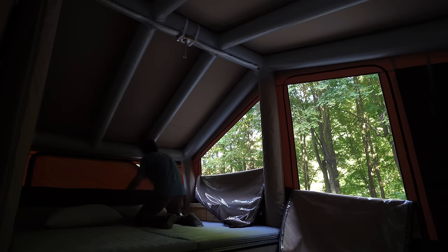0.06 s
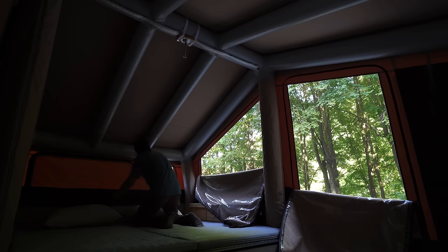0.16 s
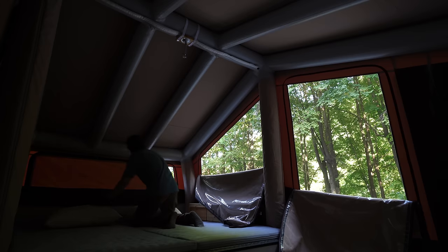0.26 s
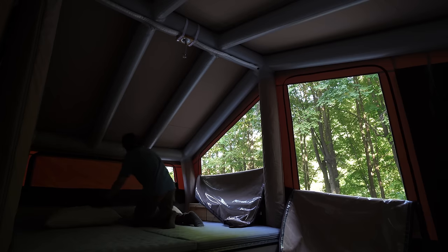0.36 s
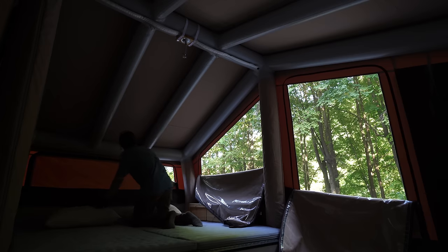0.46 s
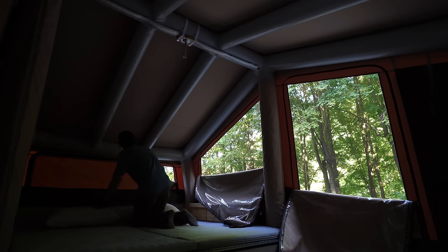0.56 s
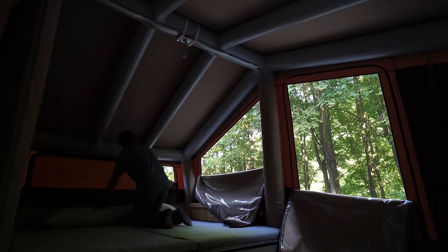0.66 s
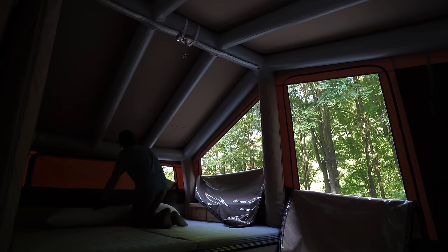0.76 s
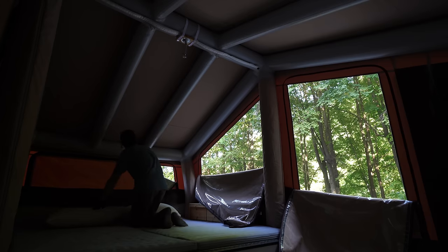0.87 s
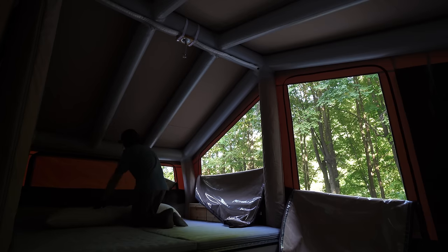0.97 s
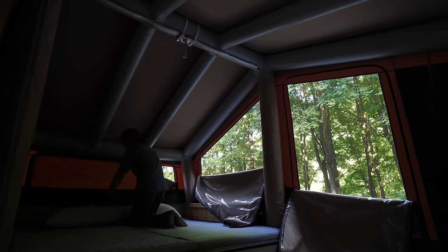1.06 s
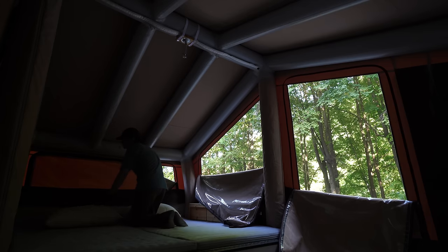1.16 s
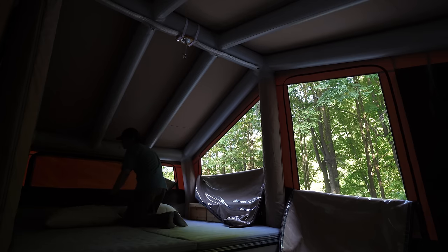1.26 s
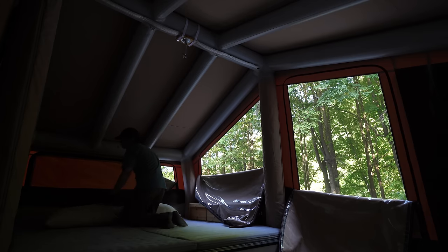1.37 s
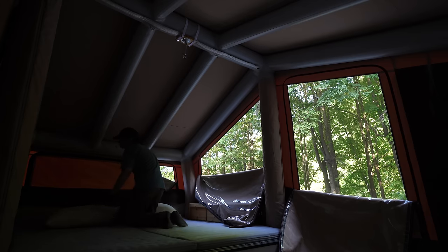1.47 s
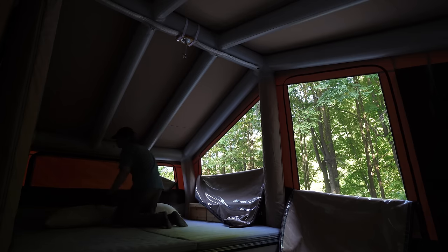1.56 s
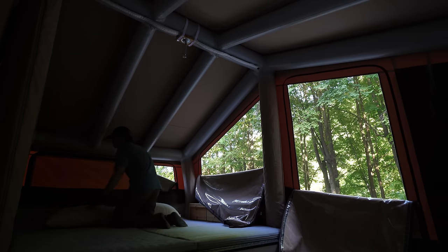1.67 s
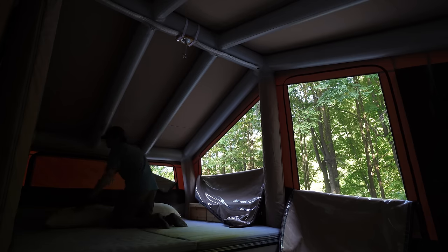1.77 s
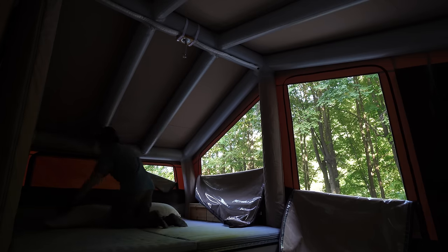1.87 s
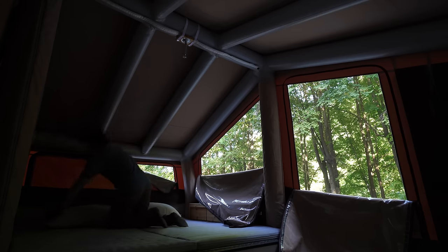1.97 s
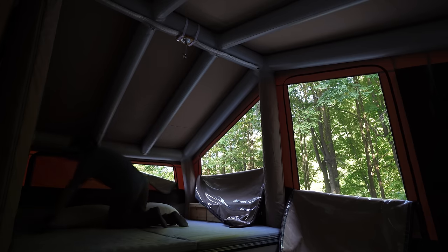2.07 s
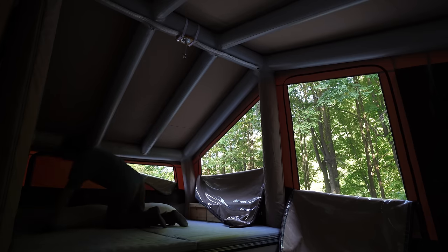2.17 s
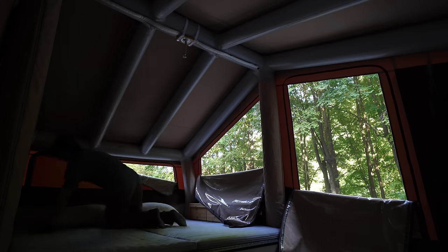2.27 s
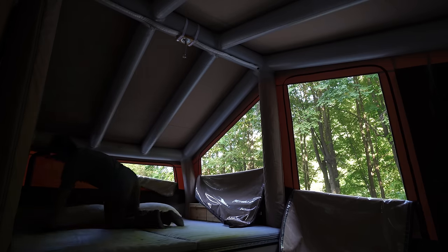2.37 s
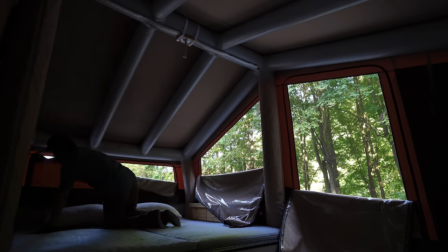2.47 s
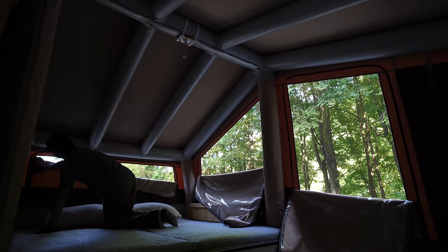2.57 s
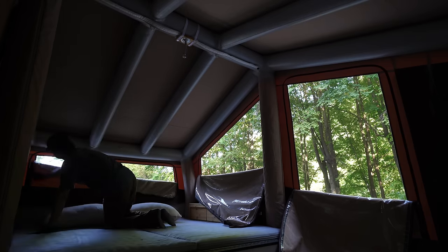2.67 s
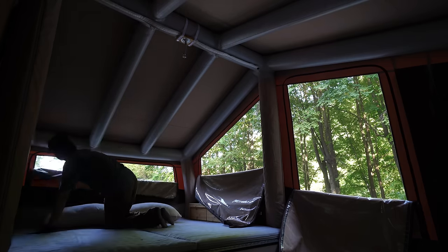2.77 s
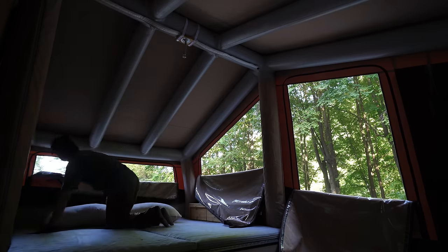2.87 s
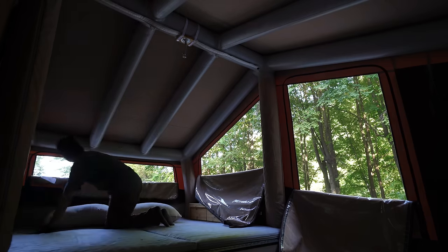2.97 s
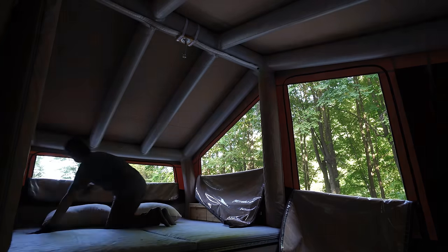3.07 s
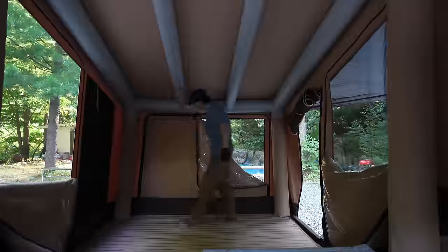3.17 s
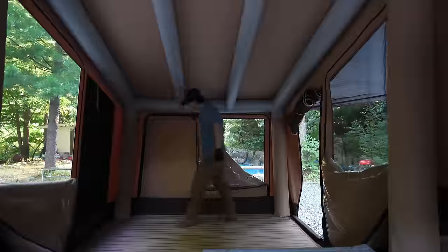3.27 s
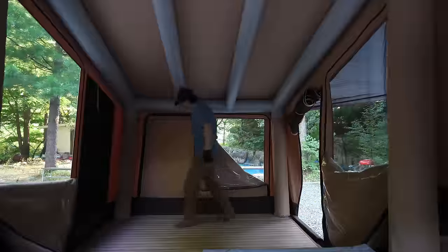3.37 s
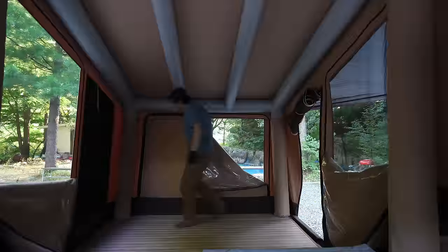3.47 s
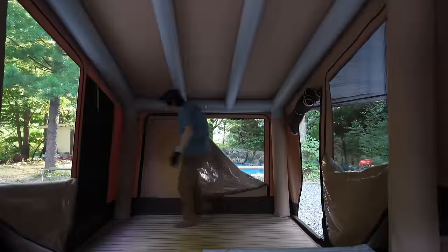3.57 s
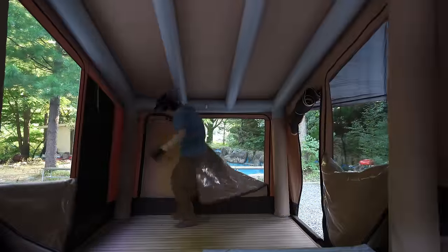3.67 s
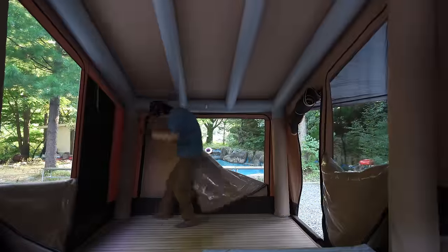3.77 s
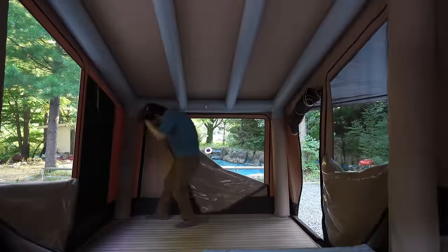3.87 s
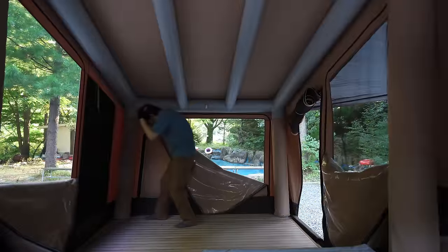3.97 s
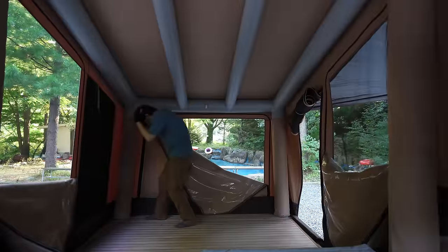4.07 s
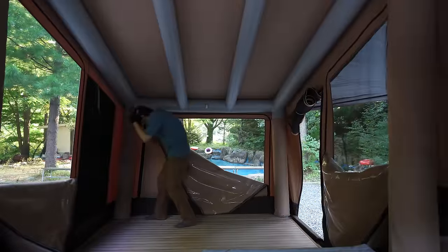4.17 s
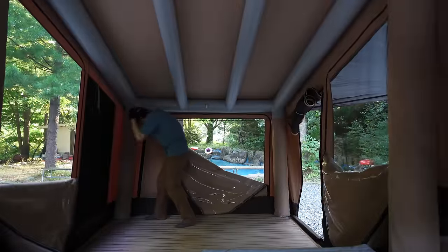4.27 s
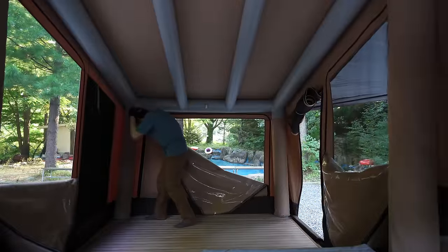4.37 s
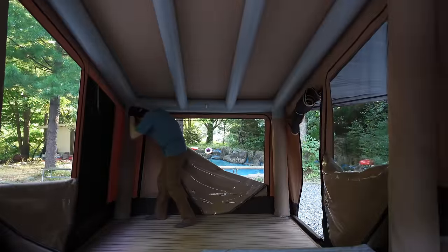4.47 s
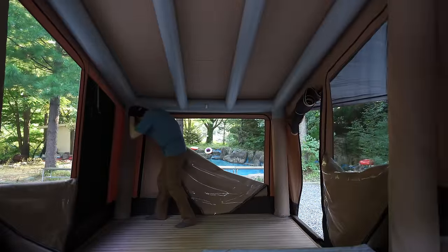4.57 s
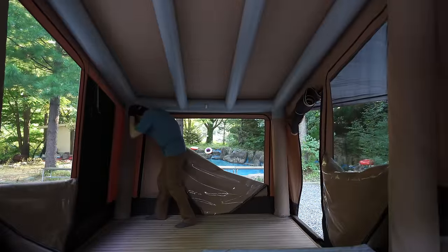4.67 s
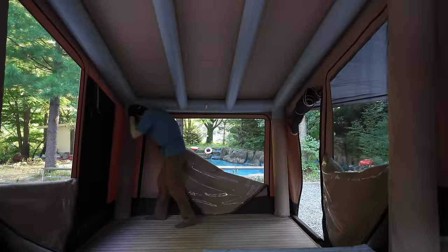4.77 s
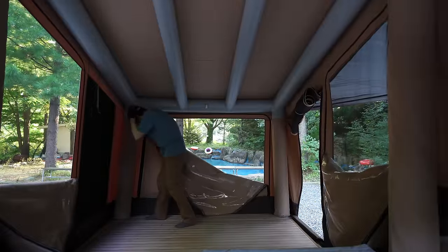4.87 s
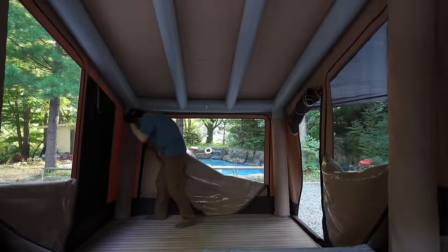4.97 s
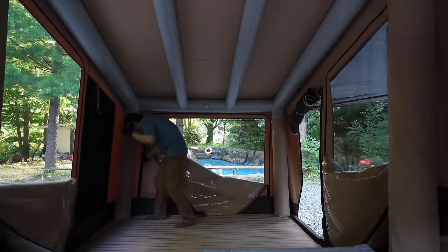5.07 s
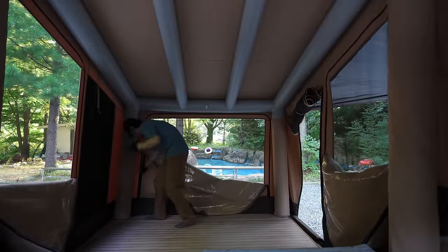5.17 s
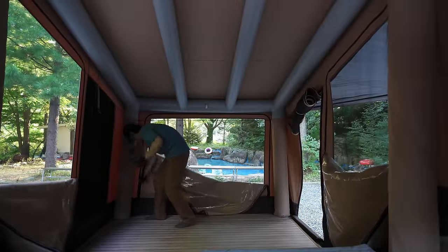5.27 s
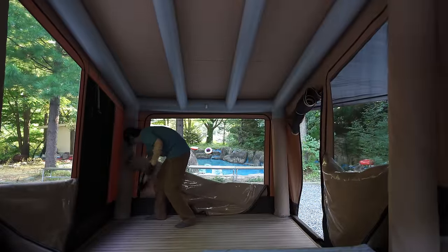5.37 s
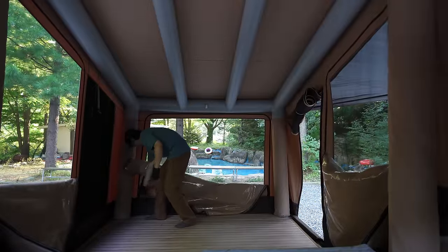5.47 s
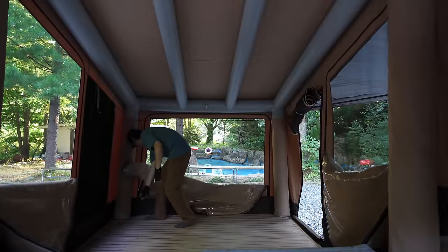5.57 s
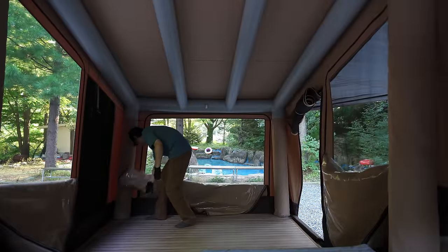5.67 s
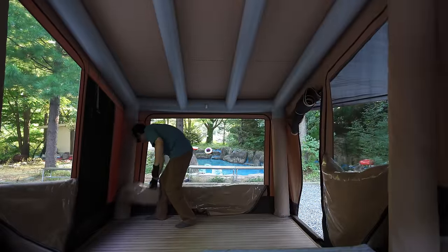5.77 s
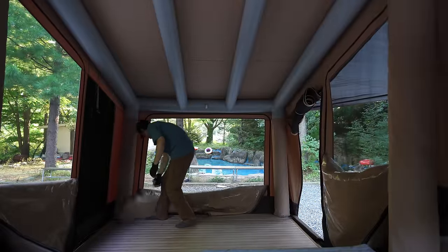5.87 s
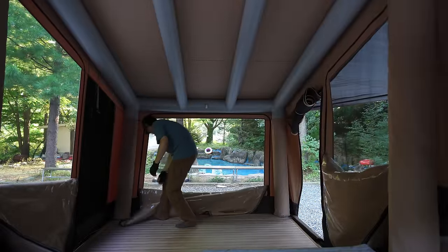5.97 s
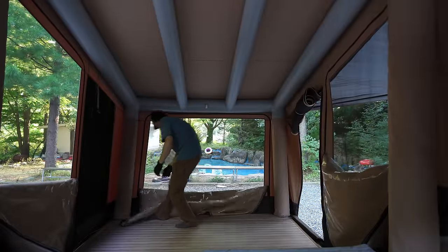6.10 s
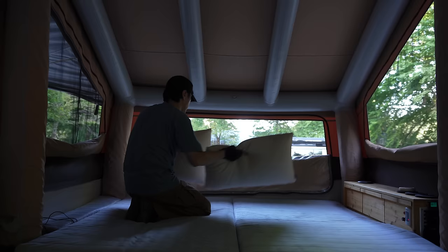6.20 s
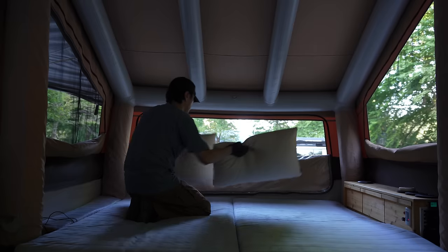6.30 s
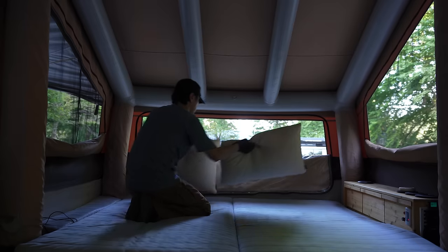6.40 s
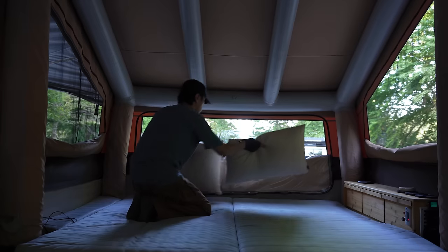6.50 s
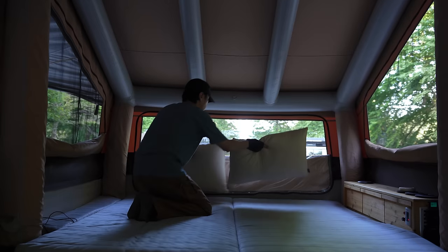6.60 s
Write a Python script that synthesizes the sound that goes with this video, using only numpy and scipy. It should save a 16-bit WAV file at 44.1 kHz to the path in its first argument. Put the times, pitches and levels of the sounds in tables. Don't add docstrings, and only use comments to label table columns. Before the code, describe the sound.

A zipper on a tent window buzzes in three long pulls, its pitch gliding up and down over crinkling coated fabric. Before the first come cloth flaps, knee thumps and tiny metal tab jingles under a fading cicada. Heavy footfalls and rumble accompany the second; slow tooth ticks lead into the third, which ends in hard snaps and a flap crack. Then near quiet, with light wind. Mono microphone inside, dry fabric acoustics.

```python
import sys
import numpy as np
from scipy import signal
from scipy.fft import rfft, irfft, next_fast_len
from scipy.io import wavfile
from scipy.ndimage import uniform_filter1d, map_coordinates

SR = 44100
rng = np.random.default_rng(int(sys.argv[2]) if len(sys.argv) > 2 else 0)


def put_to_file(sound):
    columns = np.atleast_2d(sound).T
    safe = np.clip(columns, -1, 1)
    whole_steps = np.round(safe * 32767)
    wavfile.write(sys.argv[1], SR, whole_steps.astype(np.int16))


def rack_gain(trim_db):
    fader = np.asarray(trim_db, float)
    return 10 ** (fader / 20)


N = 292824
T = np.arange(N) / SR

TAKE_BOUNDS = [0, 3.136, 6.237, 7]
TAKE = np.searchsorted(TAKE_BOUNDS, T, side="right") - 1


def unit(x):
    return x / np.sqrt(np.mean(x ** 2) + 1e-20)


def along(points, hz):
    f, v = np.transpose(points)
    return np.interp(np.log(hz + 1), np.log(f + 1), v)


def curves(rows):
    s, *cols = np.transpose(rows)
    return [np.interp(T, s, c) for c in cols]


def gate(start, end, edge):
    return np.clip(np.minimum(T - start, end - T) / edge + .5, 0, 1)


def wobble(rate, t=T):
    knots = rng.standard_normal(int((t[-1] - t[0]) * 1500))
    return map_coordinates(knots, [(t - t[0]) * rate])


def swells(rows):
    s, db, rise, fall = np.transpose(rows)[..., None]
    t, take = T[::32], TAKE[::32]
    shape_db = -20 * np.where(t < s, (s - t) / np.abs(rise), (t - s) / np.abs(fall))
    power = rack_gain(db + shape_db) ** 2 * (take == TAKE[(s * SR).astype(int)])
    return np.interp(T, t, np.sqrt(power.sum(axis=0)))


def sway(rows, t):
    s, db, half = np.transpose(rows)[..., None]
    return (db * np.exp(-((t - s) / half) ** 2)).sum(axis=0)


def filtered(x, response):
    m = next_fast_len(N + SR // 2)
    return irfft(rfft(x, m) * response(np.fft.rfftfreq(m, 1 / SR)), m)[:N]


def resonances(modes):
    return lambda f: sum(rack_gain(db) * 1j * f * w / (c * c - f * f + 1j * f * w) for c, w, db in modes)


def band_noise(hz, width):
    response = resonances([(hz, width, 0)])
    return unit(filtered(rng.standard_normal(N), lambda f: response(f) ** 2))


def noise_burst(t, order, band):
    return signal.lfilter(*signal.butter(N=order, Wn=band, btype="band"), rng.standard_normal(len(t)))


def rustle(spectrum, grain_db, grain_rate, gating=1):
    grains = rack_gain(grain_db * wobble(grain_rate)) * gating * rng.standard_normal(N)
    x = filtered(grains, lambda hz: rack_gain(along(spectrum, hz)))
    return x / np.sqrt(np.abs(uniform_filter1d(x ** 2, size=4000)) + 1e-20)


def breeze_and_floor():
    # (time [s], level [dB])
    breeze = [(0.0, -38.5), (0.3, -36), (1.05, -42), (1.44, -44.5), (2.27, -36.5), (2.55, -42), (2.7, -35),
              (3.2, -43.5), (3.4, -32), (3.86, -38), (3.98, -26.5), (4.12, -35), (4.64, -46.5), (5.09, -39),
              (5.2, -51), (6.2, -49), (6.25, -38), (6.64, -39)]
    # (frequency [Hz], density [dB per Hz])
    buffet = [(5, -9), (14, 0.5), (30, -14), (50, -21), (90, -63)]
    # (frequency [Hz], density [dB per Hz])
    rumble = [(35, -43), (60, 2.5), (80, 0), (160, -1), (300, -8.5), (500, -34.5)]
    floor_db = [-49.5, -53.5, -52]
    # (peak time [s], level [dB], rise [s], fall over 20 dB [s])
    steps = [(.37, -38.5, 0.2, 0.75), (1.08, -42, 0.071, -0.1), (1.79, -39.5, 0.06, 0.4),
             (2.25, -33.5, 0.28, 0.15), (2.7, -40, 0.13, 0), (3.33, -40.5, 0.43, 7),
             (3.705, -22.5, 0.024, 0.08), (3.92, -21.5, 0.043, 0), (4.6, -36.5, 0.055, -1),
             (5.18, -42, 0.16, 2), (5.92, -34.5, 0.066, 0.4), (6.14, -42, 0.32, -9)]
    buffet_db, = curves(breeze)
    floor = np.hypot(rack_gain(np.array(floor_db)[TAKE]), swells(steps))
    return rack_gain(buffet_db) * rustle(buffet, 1.4, 8) + rack_gain(-2.0) * floor * rustle(rumble, 2.3, 30)


def frame_shudder():
    start_s, hz, db, t60 = 3.95, 28.05, -22, 1.3
    since = np.clip(T - start_s, 0, None)
    return rack_gain(db - 60 * since / t60) * np.sin(2 * np.pi * hz * since)


def insects_and_birds():
    # (peak time [s], level [dB], rise [s], fall over 20 dB [s])
    cicada_swells = [
        (.1, -38.5, .5, 0.18),
        (.358, -42, 0.063, 0.16),
        (2.726, -54, .05, 0.73),
        (3.13, -55, .06, .1),
    ]
    # (start [s], end [s], level [dB])
    crickets = [
        (.42, .68, -55.5),
        (1.38, 1.68, -57),
        (3.25, 3.45, -59),
        (4.297, 4.6, -57),
    ]
    # (time [s], frequency [Hz], level [dB], length [s])
    birds = [
        (4.15, 5070, -57, .1),
        (6.54, 5270, -54, .06),
    ]
    steady = rack_gain(-52) * (T < TAKE_BOUNDS[1])
    pulses = 1 + 0.17 * np.sin(2 * np.pi * 115 * T)
    cicada = rack_gain(-5.5) * (steady + swells(cicada_swells)) * pulses * band_noise(8210, 1500)
    trill = sum(rack_gain(db) * gate(a, b, edge=.05) for a, b, db in crickets)
    trill = trill * (1 + .5 * np.sin(2 * np.pi * 105 * T)) * band_noise(6800, 260)
    chirps = sum(rack_gain(db) * gate(s - d / 2, s + d / 2, edge=.03) * band_noise(hz, 300)
                 for s, hz, db, d in birds)
    return cicada + trill + chirps


def cloth(cycle, drumming, drag):
    # (frequency [Hz], density [dB per Hz])
    drum_spectrum = [(200, -33), (380, -9.5), (480, 1.5), (900, 0.5), (1600, -2), (2500, -8.5), (4000, -23),
                     (7000, -60)]
    # (frequency [Hz], density [dB per Hz])
    rub_spectrum = [(700, -11), (1800, 0), (2800, 2), (4500, -1.5), (7000, -3.5), (9000, -8.5),
                    (10000, -15), (13000, -47)]
    # (frequency [Hz], density [dB per Hz])
    crackle_spectrum = [(5000, -19), (8500, 5), (10500, -1.5), (13500, 0), (15500, -5), (17000, -22)]
    # (frequency [Hz], density [dB per Hz])
    boom_spectrum = [(150, -7.5), (230, -5.5), (340, -3), (420, -5.5), (600, -35.5)]
    boom_db = [-17, -15.5, -18]
    crackle_db = [-4, -3.5, -7]
    crackle_grows = [1.077, 1.06, 1.1]
    handled_crackle_db = [-0.5, -3, -5]
    # (drumming [dB], rubbing [dB], crackle [dB])
    at_rest = [(-45.5, -50, -79), (-44, -48, -79), (-46, -49.5, -79)]
    # (peak time [s], level [dB], rise [s], fall over 20 dB [s])
    creases = [(.03, -52, .1, 0.4), (.45, -48, .15, 0), (.95, -56, 0.41, 0.5), (1.12, -63, .1, -0.1),
               (1.335, -48, 0.071, -0.05), (2.3, -37.5, .08, 0.13), (2.97, -46, 0.14, -0.5),
               (3.11, -51, .03, .3), (3.82, -32.5, 0.34, 0.3), (4.12, -45, 0.16, 0), (4.34, -57, .05, 1),
               (5.7, -50, .15, -0.5), (6.5, -73, .5, .5)]
    # (peak time [s], drumming [dB], rubbing against it [dB], rise [s], fall over 20 dB [s])
    cloth_moves = [(.3, -34.5, -11, 0.0093, -0.1), (.36, -46.5, 5, 0.085, 0.34),
                   (0.408, -27, -19, 0.043, 0.11), (0.465, -31, -23, 0.13, 0.12), (1.01, -44, -7, 0.081, -0.2),
                   (1.3, -47, -5, 0.28, 3), (1.695, -44, -4, 0.05, 0.5), (2.655, -27.5, -8, 0.062, 0.13),
                   (2.73, -41, 1, 0.046, 4), (2.835, -37, -14, 0.079, 0.15), (3.105, -40.5, 1, 0.04, 1),
                   (3.19, -46.5, 7, 0.046, 0.062), (3.318, -31.5, -13, 0.057, 0.023),
                (3.82, -26.5, -3, 0.44, 0.35), (3.925, -32, 2, 0.098, 0.11),
                (4.045, -34, 2.5, 0.072, 0.091), (4.13, -45.5, 5.5, 0.12, 0.11),
                (4.21, -46, -9, .018, 0.076), (4.34, -47, 2, 0.076, 0.15), (4.7, -35, -0.5, 0.2, 0.16),
                (4.77, -28, -7, 0.057, 0.098), (5.48, -38, 2, 0.18, 0.34), (5.6, -42.5, -2.5, 0.24, 1),
                (5.785, -38, 8.5, 0.024, 0.42), (5.75, -45, 4.5, .2, .2), (5.91, -32, -2, 0.14, 0.077),
                (6.011, -28, -6.5, 0.1, 0.15), (6.183, -36, 1.5, 0.062, 0.18)]

    handling = cloth_moves
    rest_drum, rest_rub, rest_crackle = rack_gain(np.array(at_rest))[TAKE].T
    shaking = swells([(s, db, up, down) for s, db, _, up, down in handling])
    shaken = np.sqrt(rest_drum ** 2 + drumming ** 2 + shaking ** 2)
    handled = swells([(s, db + rub_db, up, down) for s, db, rub_db, up, down in handling])
    rubbed = np.hypot(drag, handled)
    creased = np.hypot(drag, rack_gain(np.array(handled_crackle_db)[TAKE]) * handled)
    chop = 1 + .55 * cycle

    drum = shaken * rustle(drum_spectrum, grain_db=1.0, grain_rate=100)
    rub = np.hypot(rest_rub, rubbed) * rustle(rub_spectrum, grain_db=1.2, grain_rate=220, gating=chop)
    crackling = rack_gain(np.array(crackle_db)[TAKE]) * creased ** np.array(crackle_grows)[TAKE]
    crackling = np.hypot(np.hypot(rest_crackle, crackling), swells(creases))
    crackle = crackling * rustle(crackle_spectrum, grain_db=-0.5, grain_rate=440, gating=chop)
    booming = np.hypot(rack_gain(1.0) * shaken, rubbed) ** 0.36
    boom = booming * rack_gain(np.array(boom_db)[TAKE] - 20.5) * rustle(boom_spectrum, 2.5, 60)
    return drum + boom + rub + crackle


def thumps():
    # (time [s], peak [dB], tone [Hz], puff against tone [dB])
    blows = [(0.294, -32, 605, 2), (0.339, -20.5, 144, -5.5), (0.589, -24, 151, -7),
             (1.009, -23.5, 1600, -13), (1.538, -26, 510, -20), (1.711, -23, 514, -1),
             (1.728, -22, 550, -1), (1.782, -26, 960, -8), (3.706, -20, 90, 2), (2.461, -15, 1210, -2),
             (3.314, -22, 1600, -8), (2.402, -14, 640, -9), (2.714, -26, 680, 9), (2.966, -22.5, 770, 6),
             (3.3, -26, 70, -5), (3.313, -14, 82.5, -15), (3.325, -23, 120, -13), (3.324, -30.5, 2100, 6.5),
             (3.809, -20, 1379, 5.5), (3.91, -13.5, 79, 4.5), (3.914, -15, 208, 2), (3.915, -6, 634, -10),
             (3.957, -17, 640, -2), (3.986, -19, 640, -3), (3.299, -24, 900, -1), (0.397, -20, 686, -9),
             (0.406, -21, 776, -11), (0.468, -22, 540, -6), (3.313, -19, 200, -10), (3.921, -5.5, 79, -6),
             (4.029, -16, 773, 5), (4.054, -21, 340, 1), (4.114, -22.5, 1110, 4.5), (4.206, -29, 640, 8),
             (5.45, -22, 1050, 9), (5.92, -15.5, 640, 4.5), (5.925, -12, 710, -1.5), (5.937, -18.5, 797, 2),
             (5.955, -22, 600, 5), (5.999, -17, 444, -4), (6.039, -18.5, 345, -3.5),
             (6.142, -18, 1410, -2.5), (6.173, -16, 923, -1.5), (6.42, -28, 61.6, 2),
             (6.428, -25.5, 255, -1)]
    t60, shortens, puff_lowest_hz = 0.039, 0.094, 486
    out, t = np.zeros(N + SR), np.arange(SR // 4) / SR
    for s, db, hz, puff_db in blows:
        top_hz = max(hz, puff_lowest_hz)
        shape = rack_gain(-60 * t / t60 * (hz / 500) ** shortens) * (1 - np.exp(-t / 0.0015))
        puff = unit(noise_burst(t, 2, [top_hz * 0.66 / SR, top_hz * 2.82 / SR]))
        tone = np.sin(2 * np.pi * hz * t)
        out[round(s * SR):][:len(t)] += rack_gain(db - 3.5) * shape * (tone + rack_gain(puff_db) * puff)
    return out[:N]


def snaps():
    # (time [s], peak [dB], jingle against it [dB])
    cracks = [(0.338, -24, -17), (0.386, -23, -21), (0.407, -29, -16), (0.4594, -34, -15),
              (0.9394, -32, -19), (1.065, -30, -29), (1.272, -28, -24), (1.3194, -33, -15),
              (1.3418, -29, -28.5), (1.6043, -46, -39.5), (2.72, -25, -17), (2.7994, -36, -24),
              (3.1, -38, -12), (3.1702, -41, -29), (4.3151, -36, -21), (4.3494, -35, -25), (4.56, -27, -24),
              (4.6668, -26, -30), (5.4503, -12, -27), (5.459, -20, -22), (5.483, -25, -16),
              (5.5486, -25, -26), (5.588, -29, -16), (5.803, -17, -37), (5.842, -13, -37),
              (5.9204, -29, -34), (5.934, -3.5, -33), (5.939, -8, -42)]
    # (frequency [Hz], level [dB], t60 [s])
    tab_modes = [(5880, -4, .1), (9420, -1, .09), (15370, 0, .12), (8470, -5, .04), (14400, -10, .05),
                 (12700, -7, .04)]
    # (time [s], level [dB], t60 [s])
    flaps = [
        (5.9204, -18.5, 0.041),
        (5.934, -17, 0.046),
        (5.939, -19, 0.014),
    ]
    out, t = np.zeros(N + SR), np.arange(SR // 3) / SR
    for s, db, jingle_db in cracks:
        ring = np.zeros(len(t))
        for hz, level, t60 in tab_modes:
            mode_db = level + rng.normal(0, 3.5) - 60 * t / t60 + 3 * wobble(120, t)
            ring += rack_gain(mode_db) * np.sin(2 * np.pi * hz * t)
        crack = rack_gain(-60 * t / 0.031) * noise_burst(t, 1, [.12, .5])
        out[round(s * SR):][:len(t)] += rack_gain(db - 9.0) * crack + rack_gain(db + jingle_db + 1.0) * ring
    for s, db, t60 in flaps:
        out[round(s * SR):][:len(t)] += rack_gain(db - 60 * t / t60) * unit(noise_burst(t, 1, [.03, .22]))
    return out[:N]


def squeaks():
    # (start [s], end [s], from [Hz], to [Hz], level [dB])
    slips = [
        (5.78, 5.79, 3720, 3620, -25),
        (5.794, 5.826, 3600, 3050, -29),
        (5.826, 5.84, 2950, 2800, -36),
        (3.187, 3.203, 2850, 2830, -36),
    ]
    out = np.zeros(N)
    for start, end, from_hz, to_hz, db in slips:
        hz = np.interp(T, [start, end], [from_hz, to_hz]) * (1 + .012 * wobble(300))
        tone = np.sin(2 * np.pi * np.cumsum(hz) / SR)
        out += rack_gain(db + 2.5 * wobble(120)) * gate(start, end, edge=.006) * tone
    return out


def creep():
    # (time [s], level [dB])
    ticks = [(4.564, -21), (4.59, -18), (4.612, -19), (4.626, -17), (4.638, -17.5), (4.65, -19),
             (4.668, -15), (4.678, -22), (4.687, -18), (4.696, -20), (4.705, -27), (4.714, -22),
             (4.722, -24), (4.75, -25), (4.758, -23), (4.769, -21), (4.778, -22), (4.786, -17.5),
             (1.673, -28), (1.688, -28.5), (1.7, -26.5), (1.711, -19), (1.725, -30), (3.418, -34),
             (3.427, -30), (3.441, -27), (3.451, -18)]
    # (frequency [Hz], width [Hz], level [dB])
    tape_modes = [(385, 210, 5), (640, 320, 2.5), (1600, 640, -21)]
    s, db = np.transpose(ticks)
    blows = np.zeros(N)
    blows[np.round(s * SR).astype(int)] = -rack_gain(db + 23.5)
    tape = resonances(tape_modes)
    return filtered(blows, lambda hz: tape(hz) / (1 + 1j * hz / 1500) ** 2)


def partial_fade(k, t):
    mean_db, dip_db = (.3, .7) if k < 3 else (1.5, 4)
    return rack_gain(mean_db - dip_db * wobble(40, t) ** 2 + (1.2 + .7 * min(k, 2)) * wobble(220, t))


def zipper():
    # (time [s], tooth rate [Hz], click strength [dB], drag on the cloth [dB])
    long_a = [(1.708, 419, -29.5, -45.5), (1.762, 860, -27.5, -37.5), (1.788, 958, -20.5, -32),
              (1.83, 1019, -20.5, -30), (1.886, 1214, -26, -31), (1.972, 1449, -20, -28.5),
              (2.084, 1337, -26.5, -29.5), (2.125, 1178, -27, -29), (2.17, 950, -20.5, -31.5),
              (2.204, 890, -26.5, -33), (2.25, 857, -33, -35), (2.3, 701, -30, -36),
             (2.318, 606, -30.5, -37), (2.35, 520, -32, -39)]
    # (time [s], tooth rate [Hz], click [dB], drag [dB])
    regrip = [(2.35, 525, -30.5, -41.5), (2.41, 599, -28, -37), (2.45, 642, -21.5, -38),
              (2.5, 485.3, -20.5, -43.5), (2.56, 801, -17, -35.5), (2.588, 999.4, -21, -32.5),
              (2.61, 1243, -35, -31.5), (2.652, 923, -29, -36.5), (2.7, 595, -54, -51)]
    # (time [s], tooth rate [Hz], click [dB], drag [dB])
    brief = [(2.78, 452, -40, -52), (2.836, 684, -39, -40.5), (2.938, 556, -55, -46.5)]
    # (time [s], tooth rate [Hz], click [dB], drag [dB])
    long_b = [(3.415, 440.3, -43, -48), (3.495, 560.4, -24, -34), (3.538, 848, -24.5, -27.5),
              (3.618, 1226, -23.5, -28), (3.7, 1113, -23.5, -30), (3.786, 758, -29.5, -31),
              (3.812, 747, -27.5, -29.5), (3.86, 663.0, -29.5, -35), (3.905, 688, -36, -40)]
    # (time [s], tooth rate [Hz], click [dB], drag [dB])
    end_b = [(3.95, 577, -29, -32), (3.997, 621, -17.5, -32.5), (4.018, 608, -28, -40),
             (4.065, 630, -44, -46)]
    # (time [s], tooth rate [Hz], click [dB], drag [dB])
    start_c = [(4.735, 217.2, -41, -47), (4.79, 429.6, -31, -34), (4.826, 702, -30.5, -33.5),
               (4.84, 790, -35, -26)]
    # (time [s], tooth rate [Hz], click [dB], drag [dB])
    long_c = [(4.839, 803.5, -26.5, -31.5), (4.888, 862, -32, -28.5), (4.908, 1044, -37.5, -26.5),
              (4.974, 1258, -25.5, -23.5), (5.016, 1466, -20, -24.5), (5.09, 1340, -27.5, -25.5),
              (5.2, 872, -28, -27.5), (5.24, 844, -24, -24), (5.291, 880, -24, -26)]
    # (time [s], tooth rate [Hz], click [dB], drag [dB])
    end_c = [(5.29, 870, -33, -25), (5.318, 780.4, -21, -31), (5.344, 749, -19, -30.5),
             (5.386, 655.7, -28, -32.5), (5.404, 553, -24.5, -34.5), (5.428, 409, -31.5, -38),
             (5.447, 323, -41, -37)]
    edges_db = [0.5, 4, 7, 0, -0.5, 2.5, 2.5, 2]
    rasps_db = [-6.5, -4.5, -6, -6, -8, -6.5, -7.5, -6]
    # (time [s], level [dB], half length [s])
    sway_first = [(1.855, 6.5, 0.0099), (1.945, -12, 0.0085), (2.03, -6, 0.0088), (2.046, 3, 0.0063),
                  (2.16, -9.5, 0.016), (2.256, -7, 0.012), (2.38, -12, .012), (2.407, 8, 0.0071),
                  (2.444, -10, 0.014), (2.574, -14, 0.0063), (3.45, 0, 0.033), (3.522, -3, 0.009),
                  (3.615, 5.5, 0.014), (4.915, 8, .01), (5.06, -2, 0.014), (1.822, -0.5, 0.013),
                  (1.748, 1.5, .015), (1.89, 2.5, 0.032), (3.73, -2, 0.012), (2.07, -7, 0.013),
                  (3.656, -11, 0.026), (3.708, 7, 0.0092), (3.744, -3, 0.015), (3.854, 6, 0.0055),
                  (3.87, -18, .008), (3.982, -5, 0.0066), (4.946, 11.5, 0.0071), (4.974, -9, 0.014),
                  (5.0, 5, 0.014), (5.03, -6, .005), (5.15, -1, 0.022), (5.225, 2, .012),
                  (5.262, 0.5, .012), (5.33, 0.5, 0.0095), (5.36, -3, .01), (1.99, 1, .012),
                  (2.1, 3.5, .015), (5.293, -11, 0.012), (5.384, -13, 0.0093)]
    # (time [s], level [dB], half length [s])
    sway_second = [(1.79, -3, 0.044), (2.244, 6.5, .012), (2.4, 3.5, .02), (2.465, 6, .012),
                   (2.495, 12, 0.015), (2.55, -6, 0.0086), (2.57, 6.5, 0.013), (2.6, 1, 0.0048),
                   (3.446, 11, 0.023), (3.56, 0, 0.011), (3.854, 6, 0.0099), (5.205, 6.5, 0.0099),
                   (4.888, 5.5, 0.0071), (2.14, 1, .015), (3.522, 4, 0.0093), (3.61, -7, 0.025),
                   (3.7, -11, 0.018), (3.795, 9.5, 0.024), (3.83, -2, .01), (4.86, -4, .015),
                   (4.96, -0.5, 0.03), (4.998, 0, 0.0067), (5.09, 8, 0.019), (5.065, -9, 0.0078),
                   (5.24, -3, .015), (5.286, 3.5, 0.0084), (5.303, -10, 0.0052), (5.35, 7, 0.03)]
    # (time [s], level [dB], half length [s])
    sway_third = [(1.8, -4, .04), (1.865, 7, 0.015), (1.976, -4, 0.033), (2.046, -6, .01),
                  (2.064, 8.5, .008), (2.16, -12, 0.02), (2.42, 3, .012), (2.444, -10, 0.0088),
                  (2.464, 7, 0.0069), (2.52, -17, 0.02), (2.555, 10, .01), (2.576, 3, .008),
                  (3.535, 3.5, 0.04), (3.99, 3, 0.018), (5.18, 4, 0.018), (3.66, -7, 0.046), (3.7, 6, .01),
                  (3.75, -2, .02), (4.86, -8, 0.0086), (4.946, 5, .015), (5.085, -6, 0.056),
                  (5.24, -11, .015), (5.27, 2, 0.01), (5.305, -15, 0.02), (5.375, 6.5, 0.032)]

    strokes = (long_a, regrip, brief, long_b, end_b, start_c, long_c, end_c)
    whine, cycle, drumming, drag = np.zeros((4, N))
    for rows, edge_db, rasp_db in zip(strokes, edges_db, rasps_db):
        on = gate(rows[0][0], rows[-1][0], edge=0.026)
        pull = on > 0
        t, on = T[pull], on[pull]
        hz, first_db, rub_db = (c[pull] for c in curves(rows))

        uneven = 1 + .011 * wobble(45, t) + .019 * (1100 / hz) ** .6 * wobble(500, t)
        phase = 2 * np.pi * np.cumsum(hz * uneven) / SR + .12 * wobble(900, t)
        force = rack_gain(1.2 * wobble(90, t) + 1.8 * wobble(600, t))

        second_db = first_db + edge_db - 1.5 + 0.73 * (rub_db - first_db)
        third_db = first_db + edge_db - 4.5 + 0.75 * (rub_db - first_db)
        partials_db = [first_db + sway(sway_first, t), second_db + sway(sway_second, t),
                       third_db + sway(sway_third, t)]
        for k in range(10):
            rolloff_db = .5 * k + 9 * np.log2(1 + ((k + 4) * hz / 9500) ** 6)
            partials_db.append(rub_db + rasp_db - rolloff_db)
        for k, db in enumerate(partials_db):
            jitter = wobble(39.83, t) + min(.35 + .45 * k, 1.15) * wobble(170, t)
            tone = np.sqrt(2) * np.cos((k + 1) * phase + jitter)
            whine[pull] += on * rack_gain(db) * force * partial_fade(k, t) * tone

        cycle[pull] += on * np.cos(phase)
        drum_db = -31.5 + 0.32 * (first_db + 22.5) - 4 * np.log2(hz / 650)
        drumming[pull] += on * rack_gain(drum_db)
        drag[pull] += on * rack_gain(rub_db)
    return whine, cycle, drumming, drag


def tent(x):
    # (frequency [Hz], t60 [s])
    decay = [(200, 0.085), (1500, 0.13), (8000, 0.066), (16000, 0.063)]
    hz, t, z = signal.stft(rng.standard_normal(SR // 3), SR, nperseg=256)
    tail = signal.istft(z * rack_gain(-60 * t / along(decay, hz)[:, None]), SR, nperseg=256)[1]
    return signal.fftconvolve(np.pad(x, (200, 0)), tail / np.linalg.norm(tail))[:N]


def scene():
    whine, *motion = zipper()
    knocks = creep() + thumps() + snaps() + squeaks()
    outdoors = breeze_and_floor() + frame_shudder() + insects_and_birds()
    echo = tent(rack_gain(-7.5) * whine + rack_gain(-6.5) * knocks)
    mono = whine + knocks + echo + cloth(*motion) + outdoors
    return np.array([mono, mono])


def roll_off(x):
    return signal.sosfilt(signal.butter(12, 16620, fs=SR, output="sos"), x)


def record(dry):
    limit_db, knee = -4.5, 4
    held = dry[0] / (1 + np.abs(dry[0] / rack_gain(limit_db)) ** knee) ** (1 / knee)
    limited = filtered(held, lambda hz: hz < 15750)
    return roll_off(np.array([limited, limited]))


dry = scene()
out = record(dry)
put_to_file(out)
```